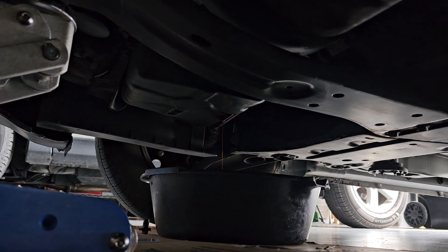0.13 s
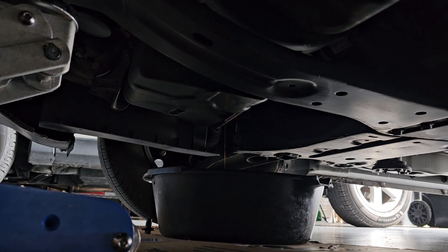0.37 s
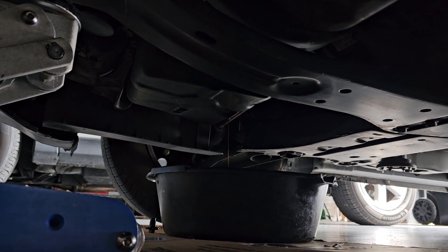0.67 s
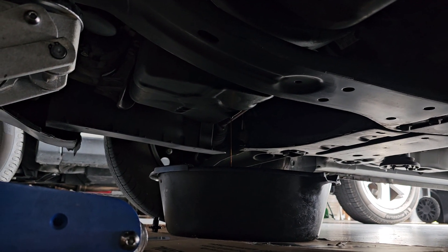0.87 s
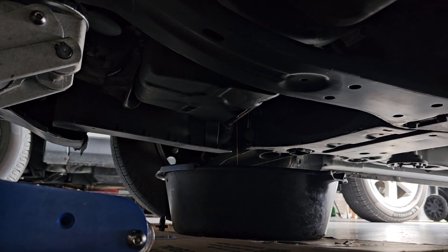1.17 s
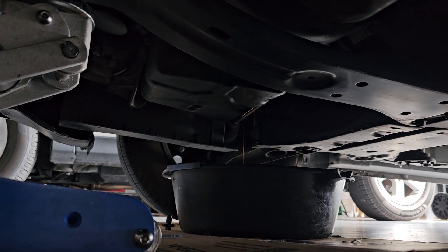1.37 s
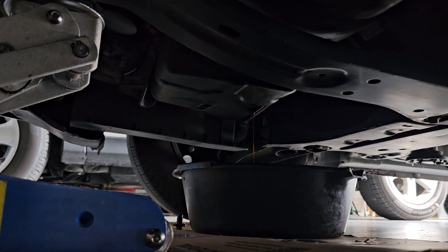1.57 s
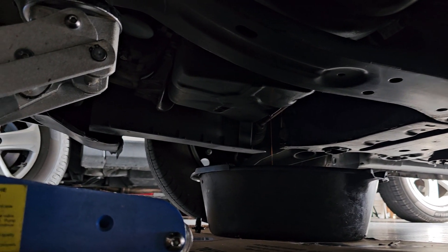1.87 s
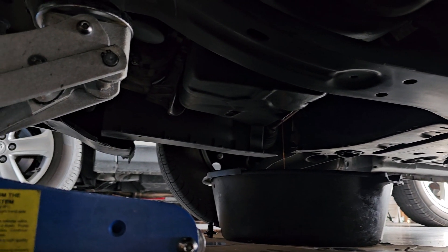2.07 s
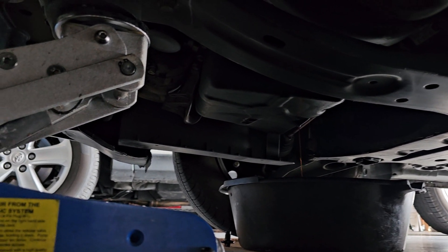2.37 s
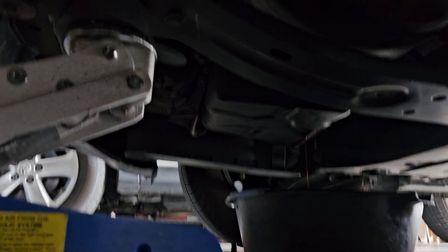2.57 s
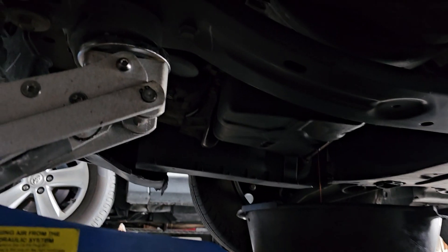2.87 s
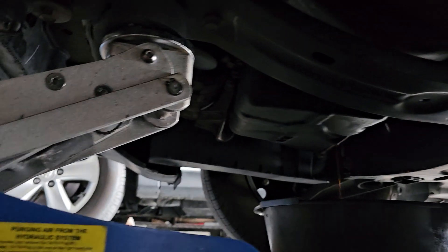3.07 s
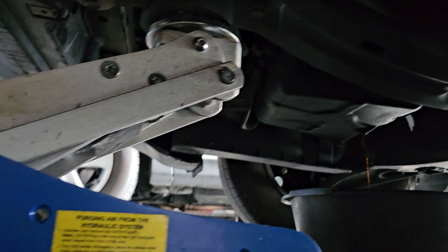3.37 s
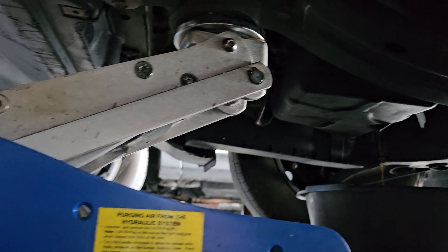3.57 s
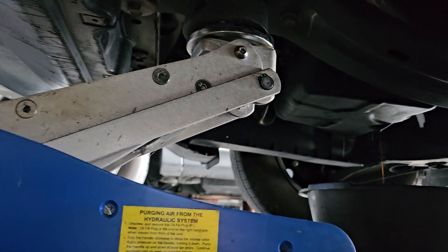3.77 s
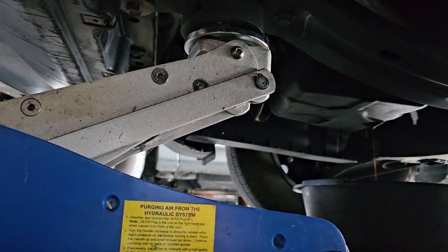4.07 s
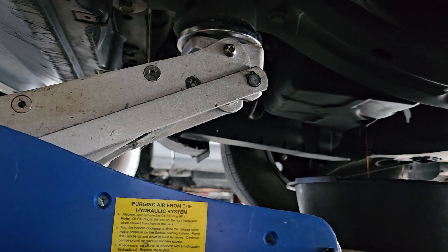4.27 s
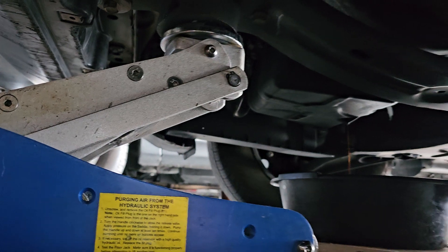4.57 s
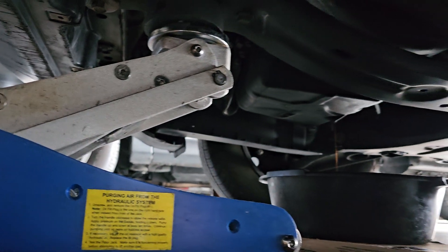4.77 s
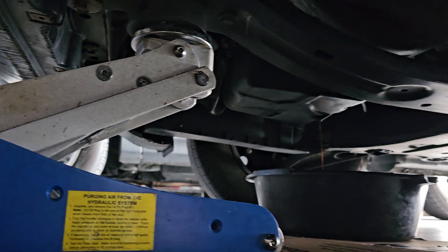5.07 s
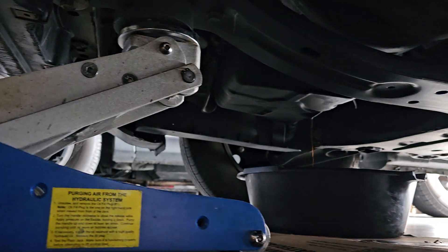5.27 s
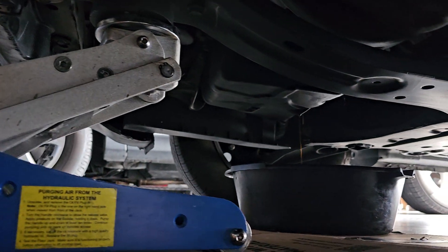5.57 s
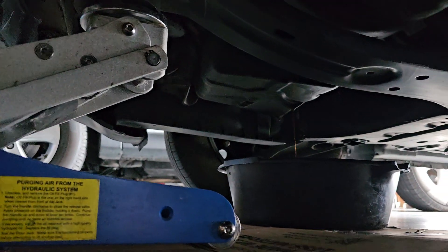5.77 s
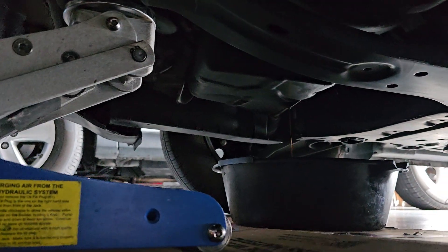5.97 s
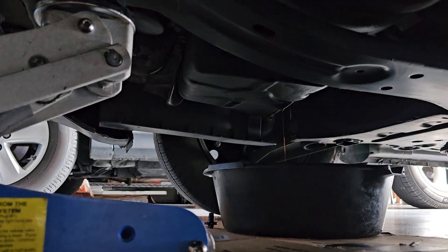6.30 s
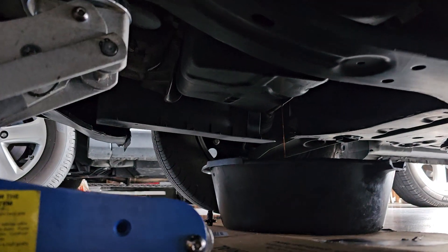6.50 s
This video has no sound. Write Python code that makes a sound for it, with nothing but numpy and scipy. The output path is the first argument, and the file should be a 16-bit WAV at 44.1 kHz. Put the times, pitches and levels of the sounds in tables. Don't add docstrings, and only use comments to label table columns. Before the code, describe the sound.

Thick oil drops tick and patter quickly and irregularly into a plastic pan under a car, over a low, distant traffic rumble.

```python
import sys
import numpy as np
from scipy import signal
from scipy.fft import rfft, irfft
from scipy.io import wavfile
from scipy.ndimage import uniform_filter1d

SR = 44100
rng = np.random.default_rng(int(sys.argv[2]) if len(sys.argv) > 2 else 0)


def dump(signal):
    limited = np.clip(np.atleast_2d(signal).T, -1, 1)
    pcm = np.round(limited * 32767).astype(np.int16)
    wavfile.write(sys.argv[1], SR, pcm)


def boost_factor(decibels):
    exponent = np.asarray(decibels, float) / 20
    return 10 ** exponent


N = 292705
TIME = np.arange(N) / SR
FREQ = np.maximum(np.fft.rfftfreq(N, 1 / SR), 1)

# f [Hz], coherence [-1 to 1]
PORT_COHERENCE = [(25, 0.95), (60, 1), (130, 0.96), (290, 0.79), (640, 0), (1410, -0.09), (3100, 0),
                  (6820, 0.04), (15000, 0)]
# f [Hz], left minus right [dB]
PORT_LEAN = [(60, 1), (110, 2), (200, 0), (380, 3), (700, 2), (1290, 9.5), (2380, 13.5), (4400, 4),
             (8120, -3), (11000, 13), (15000, -2)]
# f [Hz], level [dB per Hz]
RUMBLE_SPECTRUM = [(11, -38), (18, -25), (24, -15.5), (35, -11), (59, -1.5), (70, -0.5), (87, 0),
                   (103, -5.5), (120, -6.5), (140, -5), (167, -9.5), (227, -9.5), (340, -22.5), (440, -40),
                   (750, -120)]
# f [Hz], level [dB per Hz]
ROAD_SPECTRUM = [(180, -16.5), (300, -1), (343, -29), (381, 0.5), (428, -7), (568, -3), (709, -10),
                 (870, -14), (1880, -12), (2080, -16), (2230, -22.5), (2500, -27.5), (3250, -22.5),
                 (5500, -120)]
# f [Hz], level [dB per Hz]
AIR_SPECTRUM = [(2100, -34), (2620, -12.5), (3100, -20.5), (3880, -7), (4260, 4.5), (5050, -10),
                (6350, -6.5), (7620, -14.5), (8600, -28), (9600, -19), (11000, -20.5)]
# t [s], level [dB]
TRAFFIC_LEVEL = [(0, -52.5), (0.7, -51), (2.3, -50.5), (3.3, -53), (3.8, -53), (5.8, -54), (6.5, -52.5)]
# t [s], half width [s], swell [dB]
CAR_PASSES = [
    (0.1, 0.29, 2.5),
    (1.5, 0.21, 0.5),
    (2.1, 0.36, 3),
    (3.3, 0.55, 3),
    (6.15, 0.088, 1),
]
# t [s], f [Hz], level [dB]
START_OFF_ORDER = [
    (1.55, 126.5, -51),
    (1.8, 125.7, -51.5),
    (2.05, 127.6, -62),
]
# t [s], f [Hz], level [dB]
PULL_AWAY_ORDER = [
    (2.05, 132, -50.5),
    (2.698, 151.2, -46.5),
    (2.95, 150, -59.5),
]
# t [s], f [Hz], level [dB]
LONG_DRONE = [(0, 142.8, -68), (.4, 142, -62.5), (1.2, 142, -62), (1.36, 141.9, -52.5), (1.8, 141.4, -52),
              (2.05, 140.9, -77), (3.8, 136.4, -68), (4.2, 135.6, -61.5), (4.9, 133.9, -60),
              (6.0, 133.7, -58.5), (6.64, 134.3, -58.5)]
# start t [s], end t [s], start f [Hz], end f [Hz], level [dB]
FAR_ENGINE_ORDERS = [(1.78, 2.02, 190, 190, -59), (2.2, 2.8, 220, 228, -65), (2.88, 3.4, 234, 246, -61.5),
                     (3.25, 3.7, 163, 169, -61), (1.0, 1.9, 250, 250, -67), (4.2, 5.3, 220, 238, -67),
                     (2.16, 2.43, 585, 588, -69), (3.4, 3.6, 480, 485, -68), (5.0, 5.5, 190, 182, -64),
                     (4.9, 5.75, 462, 460, -78)]
# f [Hz], level [dB]
STRONG_LINES = [(11343, -95), (11579, -94), (11644, -93), (13980, -96), (14104, -90), (14163, -93),
                (14400, -92), (14465, -92), (14524, -94), (14583, -91), (14826, -94), (14944, -93),
                (15305, -96), (15665, -95)]
# f [Hz], level [dB]
LINE_CONTOUR = [(10900, -108), (11200, -101), (11600, -98), (12200, -103), (12900, -106), (13600, -102),
                (14400, -98), (15100, -101), (15750, -100)]
# t [s], whine gain [dB]
LAMP_FACING = [(0, 0), (2.2, 0), (3.3, 2), (4.5, 0.5), (5.5, -1.5), (6.64, -3)]
# f [Hz], level [dB per Hz]
CLOTH_SPECTRUM = [(2300, -9.5), (4700, 0), (6400, 0.5), (8500, -8), (10300, -16.5), (11500, -27),
                  (13200, -11), (14400, -38), (15800, -18)]
# t [s], attack [s], hold [s], release [s], level [dB]
SLEEVE_STROKES = [
    (2.915, 0.02, 0.19, 0.32, -80),
    (2.954, 0.42, 0.1, 0.28, -77),
    (6.076, 0.1, 0.0088, 0.09, -78.5),
]
# t [s], level [dB], f [Hz]
CASE_KNOCKS = [
    (4.332, -50.5, 475),
    (4.36, -48.5, 450),
    (4.405, -46.5, 432),
    (4.427, -50, 456),
    (4.4505, -50, 448),
]
# t [s], level [dB], f [Hz]
POOL_GULPS = [(0.197, -68, 353), (1.05, -58, 534), (1.468, -55, 430), (1.887, -66, 454), (1.976, -61, 470),
              (2.179, -53, 337), (3.305, -54.5, 322), (4.0, -60, 390), (4.481, -60, 490), (4.508, -58, 467)]
# t [s], level [dB], f [Hz]
BUBBLE_CHIRPS = [
    (3.895, -46, 1853),
    (3.919, -51, 1907),
    (3.9498, -50.5, 1860),
    (4.183, -54, 2477),
]
# f [Hz], width [Hz], level [dB]
PAN_RINGS = [(2970, 210, 10), (3650, 340, 4.5), (4220, 81, -5), (5390, 280, 2.5), (6550, 640, -2.5)]
# f [Hz], width [Hz], level [dB], left minus right [dB]
AIR_CAVITIES = [(3060, 220, 0, 1.5), (3500, 260, 0, -1), (4244, 240, -2, -2), (4900, 300, -2, -2),
                (5400, 300, -2, -2)]
# t [s], gain [dB]
RIM_SHADE = [(0, -1), (2.9, 4.5), (5.9, 0), (6.2, 4), (6.35, -18), (6.55, -10), (6.64, 8)]
# f [Hz], level [dB]
SPRAY_SPECTRUM = [(2400, -54), (4200, -2), (5400, -5), (6000, -15), (6700, 9), (7500, 4.5), (8100, 15.5),
                  (9600, 5), (12000, -33)]
# t [s], treble reach [ratio of f]
TREBLE_REACH = [(0, 0.98), (2.5, 0.91), (3.0, 0.98), (4.1, 0.87), (4.4, 0.86), (5.9, 0.98), (6.64, 0.83)]
# t [s], level over the spray [dB]
SHIELD_LEVEL = [(0, 2), (1.3, 2), (2.0, -8), (2.4, 10), (2.7, -1), (2.95, 12), (4.0, 24), (4.3, -14),
                (4.7, 6), (5.0, 12), (5.8, 8), (6.0, -10), (6.64, -10)]
# t [s], peak level [dB], upper ring f [Hz], treble over peak [dB]
BOTTOM_DROPS = [(0.027, -48, 5560, -9), (1.057, -42, 5770, -0.5), (1.1867, -50, 4640, -6),
                (1.4925, -50, 5560, -2), (1.797, -49, 4360, 0.5), (2.16, -45, 4550, 0.5),
                (2.1874, -46, 6360, -1.5), (2.2677, -56.5, 4600, 4), (2.366, -49.5, 4600, 0),
                (2.4246, -47.5, 4150, -5.5), (2.607, -49.5, 4440, -4), (2.755, -49, 4900, -4),
                (2.7973, -48.5, 7900, 2), (2.9991, -52, 4810, 7), (3.09, -52, 5370, 1),
                (3.674, -51.5, 5600, 2), (3.8602, -51, 7100, -4), (4.367, -51, 4460, -1),
                (4.5067, -48, 5390, 2), (4.5792, -60.5, 5640, 6), (4.6304, -56, 4840, 2),
                (4.679, -56, 4970, 0), (4.774, -49, 5100, 3), (4.755, -60, 4960, 3),
                (5.0702, -49.5, 4830, 0.5), (5.17, -48.5, 4600, -4), (5.2792, -49.5, 5390, -5),
                (5.745, -48.5, 4600, -3)]
# t [s], peak level [dB], upper ring f [Hz], treble over peak [dB]
WALL_DROPS = [(0.3701, -50.5, 6200, -7), (1.144, -57, 7400, 0), (1.2815, -47.5, 4450, -15),
              (1.5457, -51.5, 5366, -11), (1.928, -57, 5200, -6), (2.026, -49.5, 4500, -14),
              (2.2477, -57, 4370, -14), (2.7267, -51.5, 5420, 0.5), (2.857, -46, 5100, -2.5),
              (3.1353, -54, 5440, -4), (4.459, -43, 5370, -3.5), (4.756, -57, 6900, 5),
              (4.8604, -49.5, 7260, -12), (4.9511, -52, 4850, -12), (5.3867, -57, 6500, 7),
              (6.0162, -49, 5500, -4), (6.0364, -46, 5330, -6), (6.1853, -50, 7300, 2),
              (6.193, -50, 4940, 2), (6.176, -57, 7360, -12)]
# t [s], peak level [dB], upper ring f [Hz], treble over peak [dB]
RIM_DROPS = [(0.1826, -55, 4600, -7), (0.206, -48, 5560, 2), (0.2728, -56, 4280, 2),
             (0.3286, -52, 6100, -10), (0.71, -47.5, 4070, -9), (0.7777, -52.5, 6000, -12),
             (0.885, -54, 4730, -4), (1.0091, -47, 5140, -2), (1.201, -50, 4600, -2), (1.635, -50, 4160, 1),
             (1.7095, -58, 5200, -6), (2.3041, -47, 4370, -4), (2.3336, -53, 4600, -2),
             (2.4793, -51.5, 5200, -4), (2.701, -49.5, 5150, -4), (2.9364, -46.5, 5230, 9.5),
             (3.032, -48.5, 6550, -1), (3.7244, -52.5, 8600, 8), (3.9804, -61, 4540, -18),
             (4.012, -48.5, 4460, 5.5), (4.0774, -56.5, 5440, 1.5), (4.1583, -50.5, 5470, -5),
             (4.7152, -54, 4700, -4), (4.9013, -53.5, 5650, -7), (5.8066, -61, 8000, 5),
             (6.3031, -51, 5660, -10), (6.3552, -52.5, 5700, -12), (6.4775, -41.5, 4660, -3),
             (6.5684, -49.5, 4670, -10)]
# t [s], peak level [dB], upper ring f [Hz], treble over peak [dB]
SPOUT_DROPS = [
    (0.467, -59.5, 5300, 11),
    (3.201, -44, 5350, -2),
    (4.183, -49, 5170, -3),
]
# t [s], peak level [dB], ring f [Hz]
POOL_DROPS = [(0.0737, -55, 3200), (0.143, -47, 3940), (0.4105, -50.5, 3470), (0.533, -55, 2980),
              (0.6544, -59, 3450), (0.6797, -53.5, 4070), (0.8626, -54, 4330), (0.947, -54, 4220),
              (1.095, -50.5, 3560), (1.3698, -62, 3360), (1.4503, -47, 3390), (1.7734, -58, 2780),
              (2.1, -50, 3830), (2.56, -57.5, 3680), (2.579, -52.5, 4200), (2.915, -51, 4380),
              (3.4362, -54, 3620), (3.7673, -56.5, 3080), (3.8477, -62, 3160), (3.891, -56, 3300),
              (3.9235, -52.5, 3420), (5.0459, -56.5, 3300), (5.1226, -54.5, 3580), (5.346, -56, 3600),
              (5.299, -56.5, 3090), (3.461, -59, 3690), (3.525, -62, 3120), (2.334, -54, 4450),
              (3.336, -57, 4480), (5.649, -53.5, 4000), (5.7033, -56, 3480), (5.839, -57.5, 2820),
              (5.8925, -58, 3080), (5.941, -53, 3380)]
# t [s], peak level [dB], lower ring f [Hz], upper ring f [Hz]
SMALL_DROPS = [(0.307, -63, 3430, 5050), (0.515, -58, 2860, 8000), (0.5924, -59, 2800, 7900),
               (0.835, -74, 4270, 6430), (0.972, -56, 4600, 7000), (0.999, -58, 4420, 5900),
               (1.262, -54, 4030, 6000), (1.313, -60, 4200, 6700), (1.3917, -70, 3420, 6680),
               (1.4246, -62, 4230, 5800), (1.5526, -53, 3400, 5240), (3.016, -52, 6600, 4900),
               (3.64, -55, 4260, 6410), (3.8082, -60, 4150, 5400), (3.9126, -56, 4210, 5270),
               (4.286, -58, 3430, 5340), (4.4108, -75, 3290, 5390), (5.4896, -61, 3560, 6100),
               (5.579, -56, 3560, 6340), (5.774, -57, 4400, 7900), (6.409, -61, 4200, 5550),
               (6.449, -60, 4200, 6000), (6.503, -59, 7500, 7900), (6.549, -56, 4040, 7700),
               (6.582, -50, 6230, 8000)]
# t [s], peak level [dB], lower ring f [Hz], upper ring f [Hz]
FURTHER_DROPS = [(0.095, -68, 3300, 9150), (0.223, -55, 3460, 5300), (0.284, -51.5, 3350, 9100),
                 (0.487, -54.5, 4300, 8150), (0.692, -66, 4200, 5400), (0.726, -52, 4040, 9300),
                 (1.073, -59, 3480, 5400), (1.118, -63, 3500, 5400), (1.508, -52, 3470, 5300),
                 (1.527, -52, 3600, 5700), (1.583, -51.5, 3400, 6800), (1.826, -62, 4600, 5000),
                 (1.952, -57, 3600, 4470), (2.054, -52.5, 3450, 6600), (2.379, -60, 4500, 7300),
                 (2.623, -49.5, 3380, 4900), (3.575, -56, 3580, 4460), (3.624, -56, 4300, 5400),
                 (5.403, -55.5, 3650, 7000), (6.135, -60, 3600, 5900), (6.275, -61, 4200, 5600),
                 (6.318, -59, 3920, 5660), (6.486, -60, 4700, 7450), (6.517, -64, 4500, 7400)]

HUM_DB, HUM_FOLLOWS, ROAD_DB, ROAD_FOLLOWS = -62.5, 1, -67, 0.2
PASS_HUM_SHARE, AIR_DB = 0.63, -80
MAINS_HZ, FIZZ_DB = 60.013, -83.5
BRUSH_RANGE_DB = 11
KNOCK_LAG_S, KNOCK_PAN_DB = 0.001, 9
BOTTOM_HZ, WALL_HZ, RIM_HZ, SPOUT_HZ = 3080, 3560, 4300, 2670
RING_SPREAD = 0.029
POOL_UPPER_HZ, POOL_TREBLE_DB, SMALL_TREBLE_DB = 4600, -38, -9.5
LEAD_S, LEAD_RISE_S, LEAD_DB = 0.012, 0.003, -15
LAND_S, BUILD_S = 0.0004, 0.0018
UPPER_DB = 9
SHIELD_HZ, SHIELD_WIDTH_HZ = 9200, 500
GAP_S, GAP_DB = 0.013, 6
TOP_HZ = 15740


def level(x, db):
    return x * boost_factor(db) / np.sqrt(np.mean(x ** 2))


def along(table, hz):
    table_hz, value = np.transpose(table)
    return np.interp(np.log(hz), np.log(table_hz), value)


def over_time(table, t=TIME):
    return np.interp(t, *np.transpose(table))


def walk(rate):
    k = int(SR / rate)
    held = np.repeat(rng.standard_normal(N // k + 1), k)
    return 1.28 * uniform_filter1d(uniform_filter1d(held, k), k)[:N]


def hump(f, hz, width):
    return 1 / np.sqrt(1 + (2 * (f - hz) / width) ** 2)


def ring(hz, t60, t, phase):
    return np.sin(2 * np.pi * hz * t + phase) * np.exp(-np.log(1000) * t / t60)


def burst(spectrum, db, shape):
    return level(irfft(spectrum) * shape, db) * np.sqrt(np.mean(shape ** 2))


def add(out, s, sound, pan_db):
    i = int(s * SR)
    n = min(sound.shape[-1], N - i)
    pan = boost_factor(np.array([[pan_db], [-pan_db]]) / 2)
    out[:, i:i + n] += (sound * pan)[:, :n]


def diffuse(table, flicker_db, rate):
    like = np.clip(along(PORT_COHERENCE, FREQ), -.9, .995)
    mid, side = rfft(rng.standard_normal((2, N))) * np.sqrt([1 + like, 1 - like])
    lean_db = along(PORT_LEAN, FREQ) / 2
    lowest, highest = table[0][0], table[-1][0]
    inside = (FREQ > lowest) & (FREQ < highest)
    gain = boost_factor(along(table, FREQ) + np.array([lean_db, -lean_db])) * inside
    both = np.array([mid + side, mid - side]) * gain
    out = 0
    for octave in np.arange(np.log2(lowest), np.log2(highest) + .5, .5):
        share = np.cos(np.pi * np.clip(np.log2(FREQ) - octave, -.5, .5)) ** 2
        out = out + irfft(both * share, N) * boost_factor(flicker_db * walk(rate))
    return out / np.sqrt(np.mean(out.mean(axis=0) ** 2))


def garage():
    traffic_db = over_time(TRAFFIC_LEVEL)
    swing_db = traffic_db - traffic_db.mean()
    pass_db = sum(db * np.exp(-((TIME - s) / width) ** 2) for s, width, db in CAR_PASSES)
    rumble = diffuse(RUMBLE_SPECTRUM, 1.42, 4.02)
    upper = irfft(rfft(rumble) * (FREQ > 160), N)
    hum_db = HUM_DB + HUM_FOLLOWS * swing_db + PASS_HUM_SHARE * pass_db
    low = (rumble - upper) * boost_factor(traffic_db + 3.0) + upper * boost_factor(hum_db + 9.5)
    road = diffuse(ROAD_SPECTRUM, 1.5, 7) * boost_factor(ROAD_DB + ROAD_FOLLOWS * swing_db + pass_db)
    return low + road + diffuse(AIR_SPECTRUM, 1.0, 32.0) * boost_factor(AIR_DB)


def drone(curve, wobble_db):
    s, hz, db = np.transpose(curve)
    sounds_to_end = (s[0] <= 0) * (s[-1] * SR > N - 9)
    fade = np.clip(np.minimum(TIME - s[0], s[-1] - TIME) / 0.089 + sounds_to_end, 0, 1)
    wavering_hz = np.interp(TIME, s, hz) * (1 + .004 * walk(9))
    phase = 2 * np.pi * np.cumsum(wavering_hz) / SR
    gain = boost_factor(np.interp(TIME, s, db) + wobble_db * walk(11))
    return np.sqrt(2) * fade * gain * np.sin(phase) * boost_factor([[.6], [-.6]])


def engines():
    out = drone(START_OFF_ORDER, 2.5) + drone(PULL_AWAY_ORDER, 2.2) + drone(LONG_DRONE, 3.2)
    for start, end, start_hz, end_hz, db in FAR_ENGINE_ORDERS:
        out += drone([(start, start_hz, db), (end, end_hz, db)], 1.5)
    return out


def whine():
    order = np.arange(182, 263)
    db = along(LINE_CONTOUR, order * MAINS_HZ) + 1.5 + 3 * rng.standard_normal(len(order))
    for hz, line_db in STRONG_LINES:
        db[np.argmin(abs(order * MAINS_HZ - hz))] = line_db + 3
    phase = 2 * np.pi * rng.random((2, len(order)))
    knots = np.linspace(0, 6.64, 12)
    slow = np.array([np.interp(TIME, knots, rng.standard_normal(12)) for _ in range(9)])
    out = np.zeros((2, N))
    for k, multiple in enumerate(order):
        line = np.exp(2j * np.pi * multiple * MAINS_HZ * TIME) * boost_factor(db[k] + 2.0 * slow[k % 9])
        out += np.imag(line * np.exp(1j * phase[:, k:k + 1]))
    facing = boost_factor([[-8], [3.2]] + over_time(LAMP_FACING))
    return out * np.sqrt(2) * facing + diffuse(LINE_CONTOUR, 3.1, 12.0) * boost_factor(FIZZ_DB)


def sleeve():
    stroke = 0
    for s, attack, hold, release, db in SLEEVE_STROKES:
        shape = np.interp(TIME, np.cumsum([s, attack, hold, release]), [0, 1, 1, 0])
        stroke = stroke + boost_factor(db - BRUSH_RANGE_DB * (1 - shape)) * (shape > 0)
    return diffuse(CLOTH_SPECTRUM, 2.2, 44) * boost_factor(2.0 * walk(90)) * stroke * boost_factor(8.0)


def knocks():
    out, t = np.zeros((2, N)), np.arange(2048) / SR
    late = np.maximum(t - KNOCK_LAG_S, 0)
    swell = (late / 0.0022) ** 2 * np.exp(2 - late / 0.00097)
    for s, db, hz in CASE_KNOCKS:
        push = ring(1.14 * hz, 0.0078, t, 0)
        case = ring(0.92 * hz, 0.023, late, 0) * swell * 1.6 + 0.24 * ring(hz, 0.1, late, 0)
        add(out, s - 0.001, boost_factor(db + 4) * np.array([case, push]), KNOCK_PAN_DB)
    return out


def gulps():
    out, t = np.zeros((2, N)), np.arange(4096) / SR
    onset = 1 - np.exp(-t / 0.0032)
    for s, db, hz in POOL_GULPS:
        add(out, s, boost_factor(db + 7) * ring(hz * (1 + 4 * t), 0.045, t, 0)[None] * onset, 3)
    return out


def plops():
    out, t = np.zeros((2, N)), np.arange(4096) / SR
    onset = 1 - np.exp(-t / 0.0013)
    for s, db, hz in BUBBLE_CHIRPS:
        pair = ring(hz, 0.041, t, 0) + 0.17 * ring(1.2 * hz, 0.051, t, 7 * rng.random())
        add(out, s, boost_factor(db) * pair[None] * onset, 2.5)
    return out


def drops(events):
    out, t = np.zeros((2, N)), np.arange(2048) / SR
    f = np.maximum(np.fft.rfftfreq(len(t), 1 / SR), 1)
    since = np.maximum(t - LEAD_S, 0)
    lead_in = boost_factor(LEAD_DB) * np.exp(-abs(t - LEAD_S) / LEAD_RISE_S)
    late = np.maximum(since / BUILD_S * np.exp(1 - since / BUILD_S), lead_in)
    strike_shape = since / 0.0015 * np.exp(1 - since / 0.0014)
    for s, db, low_hz, high_hz, treble_db in events:
        noise, chance = rfft(rng.standard_normal((5, len(t)))), rng.random(3)
        slow = 0.0017 * (0.39 + chance[0])
        landing = 1.483 * (1 - np.exp(-since / LAND_S)) * np.exp(-since / (1.77 * slow))
        swell = np.maximum(landing, lead_in)

        lean_db = np.interp(low_hz, [3100, 4200], [1.6, -1.2])
        low, high = hump(f, low_hz, 436) ** 2, hump(f, high_hz, 580) ** 2
        high_over_low_db = treble_db + UPPER_DB
        low_db = -10 * np.log10(1 + boost_factor(high_over_low_db) ** 2)
        splat = burst(noise[0] * low * boost_factor([[lean_db], [-lean_db]]), low_db - 1.0, late)
        splat += burst((0.61 * noise[0] + 0.5 * noise[3:]) * high, low_db + high_over_low_db, swell)

        strike = level(irfft(noise[2] * hump(f, 4980, 3200) ** 2), -8) * strike_shape
        bubble = boost_factor(-12.0) * ring(low_hz * (0.61 + 1.4 * since), 0.046, since, 7 * chance[1])
        bubble *= 1 - np.exp(-since / 0.00085)

        reach = over_time(TREBLE_REACH, s) * (0.88 + 0.14 * chance[2])
        shield = 1 + boost_factor(3 + over_time(SHIELD_LEVEL, s)) * hump(f, SHIELD_HZ, SHIELD_WIDTH_HZ) ** 2
        spray_colour = boost_factor(along(SPRAY_SPECTRUM, f / reach)) * shield
        spray = burst((0.83 * noise[1] + noise[3:]) * spray_colour, treble_db - 5, swell ** 0.67)
        sound = boost_factor(db - 10.5) * (strike + splat + bubble + spray)
        add(out, max(s - .0004 - LEAD_S, 0), sound, -2.5)
    return out


def spatter(count=1300):
    parts_hz = (BOTTOM_HZ, WALL_HZ, WALL_HZ, RIM_HZ)
    rows = []
    for when, size, part, pitch, detune in rng.random((count, 5)):
        low_hz = parts_hz[int(4 * part)] * (1 + 0.23 * (detune - .5))
        rows.append((6.62 * when, -75 + 16 * size ** 3, low_hz, 4600 + 4800 * pitch, -16 + 10 * detune))
    return drops(rows)


def drip_list():
    rows = [(s, db, hz, POOL_UPPER_HZ, POOL_TREBLE_DB) for s, db, hz in POOL_DROPS]
    for table in (SMALL_DROPS, FURTHER_DROPS):
        rows += [(*drop, SMALL_TREBLE_DB) for drop in table]
    parts = ((BOTTOM_DROPS, BOTTOM_HZ), (WALL_DROPS, WALL_HZ), (RIM_DROPS, RIM_HZ), (SPOUT_DROPS, SPOUT_HZ))
    for table, hz in parts:
        for s, db, upper_hz, treble_db in table:
            low_hz = hz * (1 + RING_SPREAD * rng.standard_normal())
            rows.append((s, db, low_hz, upper_hz, treble_db))
    return rows


def underbody(dry, t60, wet_db, modes_db):
    t = np.arange(int(.3 * SR)) / SR
    f = np.fft.rfftfreq(len(t), 1 / SR)
    colour = 1 + sum(boost_factor(modes_db + db) * hump(f, hz, width) ** 2 for hz, width, db in PAN_RINGS)
    tail = irfft(rfft(rng.standard_normal((2, len(t)))) * colour * hump(f, 0, 23000) ** 2, len(t))
    tail *= np.exp(-np.log(1000) * t / t60) * (t > .0015) * boost_factor(GAP_DB / (1 + (t / GAP_S) ** 8))
    tail *= boost_factor(wet_db) / np.sqrt(np.sum(tail ** 2, axis=1, keepdims=True))
    cavity = 0
    for hz, width, db, pan_db in AIR_CAVITIES:
        peak = signal.iirpeak(hz, hz / width, SR)
        answer = signal.lfilter(*peak, signal.lfilter(*peak, dry))
        cavity = cavity + boost_factor(db + np.array([[pan_db], [-pan_db]]) / 2) * answer
    dry = np.array([np.roll(dry[0], 7), dry[1]])
    heard = cavity + dry + signal.fftconvolve(dry, tail, axes=1)[:, :N]
    bottom = irfft(rfft(heard) * hump(FREQ, BOTTOM_HZ, 1200) ** 2, N)
    return heard + bottom * (boost_factor(over_time(RIM_SHADE)) - 1)


def scene():
    background = garage() + engines() + whine()
    handling = sleeve() + knocks()
    oil = underbody(drops(drip_list()) + spatter() + plops(), t60=0.18, wet_db=-2, modes_db=-1.4)
    return background + handling + gulps() + oil


def top_cut(x):
    return signal.sosfilt(signal.butter(12, 15900, fs=SR, output="sos"), x)


def record(dry):
    low_pass = signal.ellip(8, .2, 70, TOP_HZ, fs=SR, output="sos")
    mix = signal.sosfilt(low_pass, dry)
    return top_cut(mix)


dry = scene()
out = record(dry)
dump(out)
```